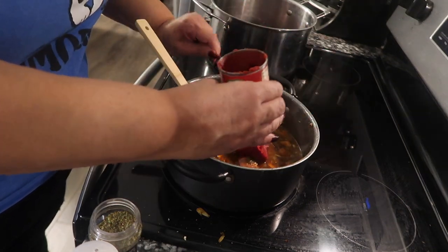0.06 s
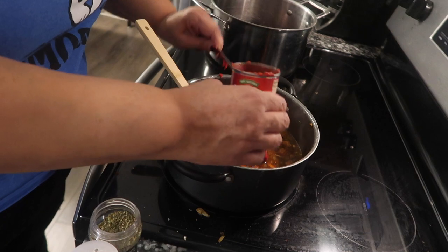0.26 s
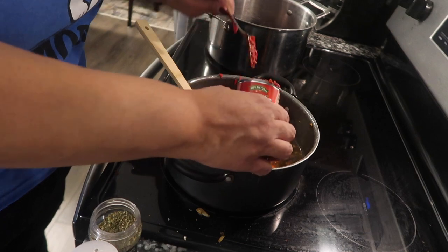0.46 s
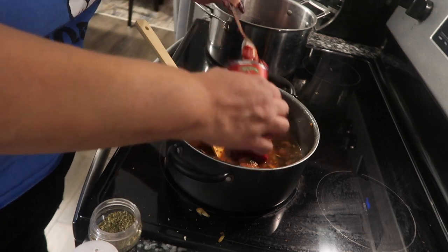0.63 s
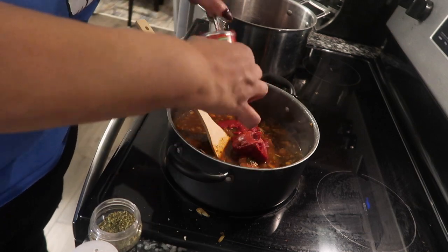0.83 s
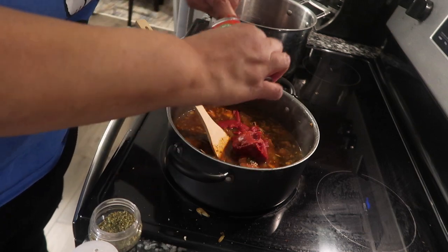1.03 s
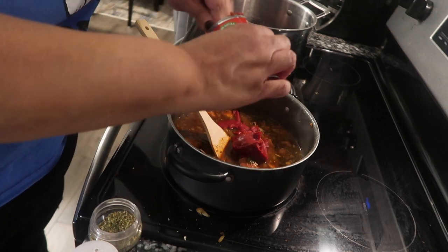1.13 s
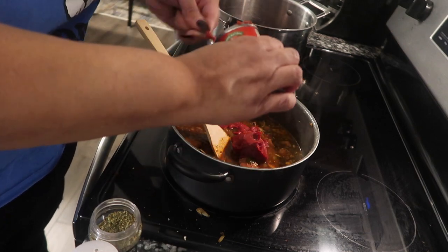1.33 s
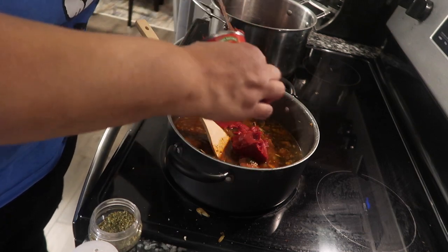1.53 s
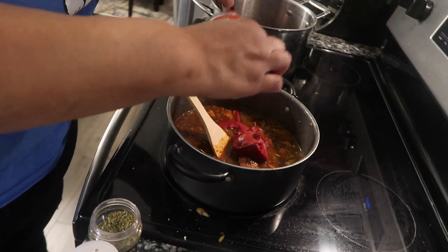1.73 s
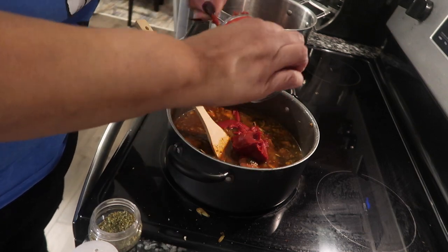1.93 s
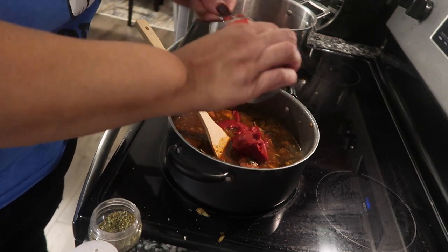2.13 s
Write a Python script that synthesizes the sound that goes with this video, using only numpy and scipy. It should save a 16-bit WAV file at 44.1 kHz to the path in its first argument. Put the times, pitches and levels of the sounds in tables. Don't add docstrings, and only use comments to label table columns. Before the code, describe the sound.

A metal spoon raps a pot rim twice, loud and close, then scrapes and knocks inside a small hand-held tin can with faint wet smacks; low extractor fan hum, small kitchen, close stereo microphone.

```python
import sys
import numpy as np
from scipy import signal
from scipy.fft import rfft, irfft
from scipy.io import wavfile

SR = 44100
rng = np.random.default_rng(int(sys.argv[2]) if len(sys.argv) > 2 else 0)


def level_to_linear(level):
    exponent = np.asarray(level, float) / 20
    return 10 ** exponent


def digitize_waveform(pressure):
    field = np.atleast_2d(pressure).T
    bounded = np.clip(field, -1, 1)
    quanta = np.round(bounded * 32767).astype(np.int16)
    wavfile.write(sys.argv[1], SR, quanta)


N = 96446

# (frequency [Hz], level [dB per Hz])
METAL_COLOUR = [(59, -42), (100, -10.5), (367, -8), (748, -4), (2180, -10), (2990, -4), (4640, -32.5),
                (7050, -18.5), (15000, -44)]
# (frequency [Hz], level [dB], t60 [s])
CAN_WALL = [(1240, -11, 0.028), (1680, -57, 0.005), (2084, -5, 0.026), (2328, 1, 0.02), (2580, -0.5, 0.019),
            (3020, -2.5, 0.017), (3309, -7, 0.033), (3670, -7.5, 0.024), (4190, -4.5, 0.0075),
            (4800, -7.5, 0.014), (5260, -11, 0.014), (5800, -12.5, 0.018), (6590, -20, .012),
            (7740, -15, .008)]
# (frequency [Hz], level [dB], t60 [s])
GRIPPED_HOLLOW = [(690, -8, 0.11), (796, -1.5, 0.045), (858, 2.5, .07), (1000, -23.5, 0.014)]


def at_hz(points, hz):
    table = np.array(points)
    return np.interp(np.log(hz + 1), np.log(table[:, 0]), table[:, 1])


def rms_one(x):
    return x / np.sqrt(np.mean(x ** 2) + 1e-20)


def colour(x, points):
    hz = np.fft.rfftfreq(len(x), 1 / SR)
    return irfft(rfft(x) * level_to_linear(at_hz(points, hz)), len(x))


def lowpass(x, order, cut_hz):
    return signal.sosfilt(signal.butter(order, cut_hz, fs=SR, output="sos"), x)


def ring(clicks, hz, t60):
    radius = level_to_linear(-60 / (t60 * SR))
    angle = 2 * np.pi * hz / SR
    return signal.lfilter([0, np.sin(angle)], [1, -2 * radius * np.cos(angle), radius * radius], clicks + 1e-18)


def strike(s, db, modes, spread_db, size, flip=True):
    out = np.zeros(size)
    luck = rng.standard_normal((len(s), len(modes), 2))
    for k, (hz, level_db, t60) in enumerate(modes):
        sign = np.sign(luck[:, k, 1]) if flip else 1
        clicks = np.zeros(size)
        clicks[(s * SR).astype(int)] = level_to_linear(db + level_db + spread_db * luck[:, k, 0]) * sign
        out += ring(clicks, hz, t60)
    return out


def bursts(s, db, t60, size):
    clicks = np.zeros(size)
    clicks[(s * SR).astype(int)] = level_to_linear(db)
    return signal.lfilter([1], [1, -level_to_linear(-60 / (t60 * SR))], clicks + 1e-18)


def kitchen(x):
    t60_s, wall_cut_hz = 0.57, 4600
    t = np.arange(SR) / SR
    white = rng.standard_normal((2, SR))
    low = lowpass(white, 1, wall_cut_hz)
    tail = low * level_to_linear(-60 * t / t60_s) + (white - low) * level_to_linear(-120 * t / t60_s)
    tail = tail * np.clip(t / .008, 0, 1)
    tail = tail / np.sqrt(np.sum(tail[0] ** 2))
    return signal.fftconvolve(x[None], tail, axes=1)[:, :len(x)]


def raps():
    # (time [s], peak level [dB])
    rap_hits = [
        (-.03, -5),
        (.173, -6.5),
    ]
    # (frequency [Hz], level [dB], t60 [s])
    pot_modes = [(188, -17, .2), (361, -24, .2), (630, -18, .12), (860, -30, .15), (1550, -16, .04),
                 (1900, -20, .05), (2400, -26, .18), (2530, -26, .22), (3000, -24, .08), (6150, -46, .12),
                 (6290, -44, .15)]
    crack_db, room_db = -3.5, -13
    hold_s, clatter_t60_s = 0.01, 0.043
    lead = SR // 5
    size = N + lead
    s, db = np.transpose(rap_hits)
    s = s + lead / SR
    t = np.arange(size) / SR
    shape = bursts(s, db + crack_db, 0.01, size)
    for start, level_db in zip(s, db):
        fall_s = np.maximum(t - start - hold_s, 0)
        shape = shape + (t >= start) * level_to_linear(level_db - 60 * fall_s / clatter_t60_s)
    clatter = shape * rms_one(colour(rng.standard_normal(size), METAL_COLOUR)) * .5
    close = clatter + strike(s, db, pot_modes, spread_db=2.0, size=size)
    return close[lead:], level_to_linear(room_db) * kitchen(close)[:, lead:]


def fan():
    # (frequency [Hz], level [dB per Hz])
    air_colour = [(12, -67), (20, -11.5), (65, 0.5), (140, -17), (189, -2), (211, -13), (328, -13),
                  (10600, -43.5), (14000, -59)]
    # (frequency [Hz], width [Hz], level [dB])
    motor_tones = [(41.2, 5, -64), (58.1, 1.2, -56), (181.9, 11, -64.5)]
    air_db, hiss_db = -52.5, -96
    rise_db, rise_mid_s, rise_s = 9.5, 1.12, 0.22
    out = level_to_linear(air_db) * np.array([rms_one(colour(v, air_colour)) for v in rng.standard_normal((2, N))])
    for hz, width_hz, db in motor_tones:
        tone = ring(rng.standard_normal(2 * N), hz, 3.7 / width_hz)[N:]
        out[0] += level_to_linear(db) * rms_one(tone)
    out += level_to_linear(hiss_db) * rng.standard_normal((2, N))
    recovery = np.tanh((np.arange(N) / SR - rise_mid_s) / rise_s)
    return out * level_to_linear(rise_db * .5 * (1.5 + recovery))


def smacks():
    # (time [s], level [dB], frequency [Hz])
    pops = [
        (.415, -46, 1270),
        (.575, -48, 1270),
        (.63, -50, 700),
        (1.54, -41, 1250),
        (1.575, -43, 1650),
        (1.60, -43, 1200),
        (1.625, -44, 800),
        (1.645, -42, 750),
        (1.665, -43, 1250),
    ]
    t60_s = .025
    return sum(strike(np.array([s]), db, [(hz, 0, t60_s)], spread_db=0.5, size=N) for s, db, hz in pops)


def scraping():
    # (start [s], hardest [s], end [s], level [dB], hollow share [dB])
    scrape_strokes = [(0.789, 0.867, .872, -40, -3.5), (.91, .95, 0.98, -35, 0.5),
                      (0.987, 1.005, 1.069, -30.5, -14), (1.064, 1.13, 1.179, -35.5, -17),
                      (1.16, 1.235, 1.314, -28, -9), (1.383, 1.41, 1.51, -45, -4.5),
                      (1.455, 1.485, 1.482, -34.5, -26), (1.695, 1.73, 1.75, -33, -1),
                      (1.728, 1.80, 1.96, -36.5, -10), (1.807, 1.89, 1.93, -49, 6.5),
                      (1.952, 1.983, 2.02, -37.5, 1.5), (1.996, 2.046, 2.046, -30.5, -8),
                      (2.131, 2.15, 2.14, -22.5, -6)]
    edge_db = -9.5
    slips_per_s, slip_spread = 1700, 3.8
    judder_db, judder_hz = 1.5, 40.5
    wander_db, wander_hz = 4, 9.5
    rasp_db, rasp_hz = -11, 7210
    t = np.arange(N) / SR
    wall, hollow = 0, 0
    for start, hardest, end, db, share_db in scrape_strokes:
        press = level_to_linear(np.interp(t, [start, hardest, end], [db + edge_db, db, db + edge_db]))
        press = press * np.clip(np.minimum(t - start, end - t) / .006, 0, 1)
        wall = wall + press
        hollow = hollow + press * level_to_linear(share_db)
    judder = rms_one(lowpass(rng.standard_normal(N), 2, judder_hz))

    def wander():
        return wander_db * rms_one(lowpass(rng.standard_normal(N), 2, wander_hz))

    def slips():
        chance, luck, side = rng.random((3, N))
        size_db = np.minimum(-slip_spread * np.log(luck + 1e-9), 18) + judder_db * judder + wander()
        return rms_one((chance < slips_per_s / SR) * level_to_linear(size_db) * np.sign(side - .5))

    def body(drive, modes):
        total = sum(ring(slips() * drive, hz, t60) * level_to_linear(db) for hz, db, t60 in modes)
        return total / np.sqrt(sum(level_to_linear(2 * db) * t60 * SR / 28 for _, db, t60 in modes))

    band = signal.butter(2, [1800, rasp_hz], "band", fs=SR, output="sos")
    rasp = signal.sosfilt(band, wall * level_to_linear(wander()) * rng.standard_normal(N))
    return body(wall, CAN_WALL) + body(hollow, GRIPPED_HOLLOW) + level_to_linear(rasp_db) * 2 * rasp


def knocks():
    # (time [s], peak level [dB], hollow share [dB], favoured wall pitch [Hz])
    can_hits = [(0.8724, -9.5, -5.5, 2070), (0.9507, -24.5, -6, 2330), (0.9966, -28.5, -45, 2460),
                (1.0124, -22.5, -22, 2570), (1.1089, -23, -19, 2580), (1.1343, -23, -27, 2500),
                (1.1495, -22.5, -20, 2200), (1.2057, -17, -42, 2420), (1.2231, -14.5, -17, 2230),
                (1.2324, -15.5, -28, 2370), (1.2462, -15, -21, 2180), (1.2564, -30.5, -35, 2650),
                (1.2645, -34.5, -36, 2590), (1.2774, -34.5, -19, 2400), (1.295, -18, -14, 2400),
                (1.3443, -34, -7, 2350), (1.4421, -23, -10.5, 2470), (1.4775, -37, -21, 2500),
                (1.4874, -23, -19.5, 2440), (1.5394, -43, -4, 2230), (1.5703, -39.5, -23, 1970),
                (1.6212, -42, -6.5, 1750), (1.718, -34.5, -26, 2450), (1.7324, -39, -21, 2220),
                (1.7913, -23.5, -32, 3170), (2.0253, -27.5, -49, 3370), (2.1334, -29.5, -23, 2400),
                (2.1435, -16.5, -14.5, 2500)]
    # (frequency [Hz], level [dB], t60 [s])
    loose_hollow = [(861, -40, 0.054), (901, 1, 0.13), (941, -2, 0.14), (1030, -8.5, 0.06),
                    (1593, -1, 0.013)]
    wall_db, hollow_db, tick_db = -5, 0, -17
    favour_db_per_oct, soft_hz = 7, 3970
    contact_step_s, contact_step_db = 0.001597, -4.5
    damping = 0.84
    grip_from_s = 1.1
    s, db, share_db, spot_hz = np.transpose(can_hits)
    tick = bursts(s, db + tick_db, 0.023, N) * rms_one(colour(rng.standard_normal(N), METAL_COLOUR))
    wall = 0
    gaps = rng.uniform(0.82, 1.457, (len(s), 3))
    for hz, level_db, t60 in CAN_WALL:
        near_db = db + wall_db - favour_db_per_oct * np.abs(np.log2(hz / spot_hz))
        mode = [(hz, level_db, t60 * damping)]
        for k in range(3):
            touch_s = s + k * contact_step_s * gaps[:, k]
            wall = wall + strike(touch_s, near_db + k * contact_step_db, mode, spread_db=2.5, size=N)
    wall = lowpass(wall, 2, soft_hz)
    low_db = db + share_db + hollow_db
    free = s < grip_from_s
    loose = strike(s[free], low_db[free], loose_hollow, spread_db=0.74, size=N, flip=False)
    tight = strike(s[~free], low_db[~free], GRIPPED_HOLLOW, spread_db=4.0, size=N)
    return wall + tick + loose + tight


def scene():
    # (frequency [Hz], level [dB])
    port_mid = [(300, -2.5), (4000, -2), (7000, -3.5), (9000, -9.5), (11000, -13.5), (12500, -14),
                (14000, -8.5), (15300, -26)]
    # (frequency [Hz], level [dB])
    port_side = [(60, -45.5), (290, -16.5), (640, -22.5), (2200, -28.5), (4500, -9), (8000, -6),
                 (12500, -2), (15000, -19)]
    can_low_cut_hz, can_room_db = 617, -12
    lean, diffuse_side = -.1, 1.35
    rap, rap_room = raps()
    low_cut = signal.butter(3, can_low_cut_hz, "high", fs=SR, output="sos")
    can = signal.sosfilt(low_cut, scraping() + knocks() + smacks())
    diffuse = rap_room + level_to_linear(can_room_db) * kitchen(can) + fan()
    field = rap + can + diffuse[0]
    mid = colour(field, port_mid)
    turned = np.imag(signal.hilbert(field))
    side = colour(turned + lean * field + diffuse_side * diffuse[1], port_side)
    return np.array([mid + side, mid - side])


def band_limit(x):
    return signal.sosfilt(signal.butter(12, 15680, fs=SR, output="sos"), x)


def record(dry):
    limit = 1.2
    mix = limit * np.tanh(dry / limit)
    return band_limit(mix)


dry = scene()
out = record(dry)
digitize_waveform(out)
```